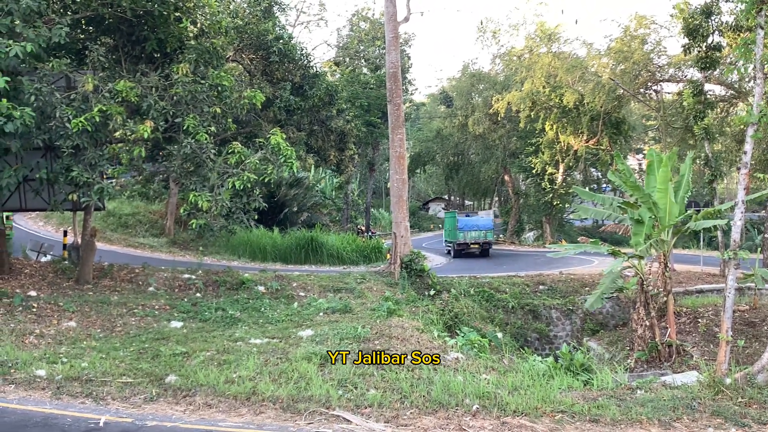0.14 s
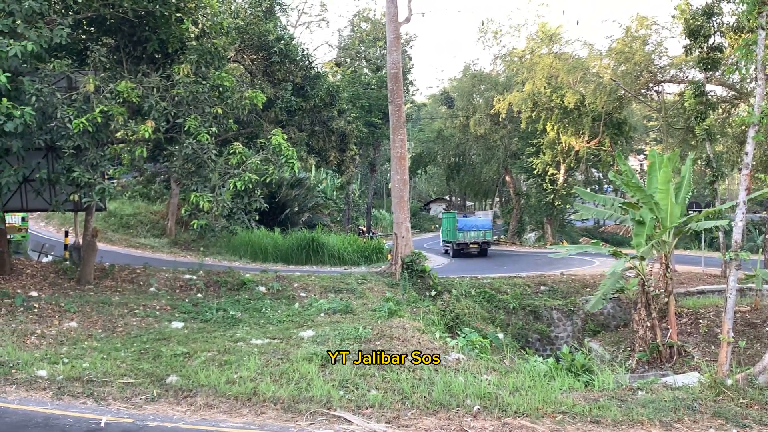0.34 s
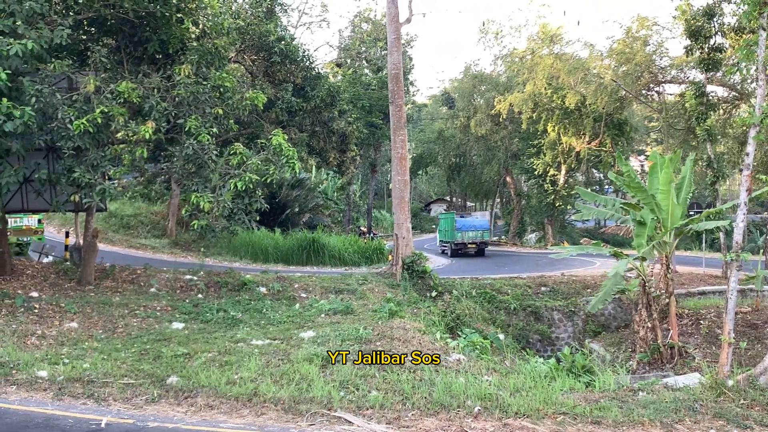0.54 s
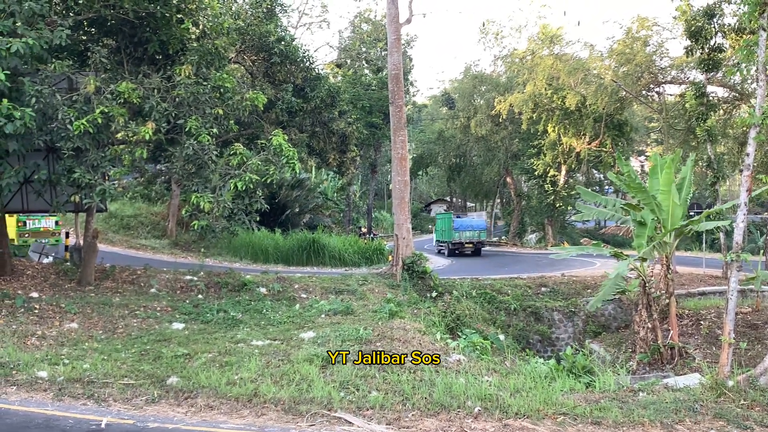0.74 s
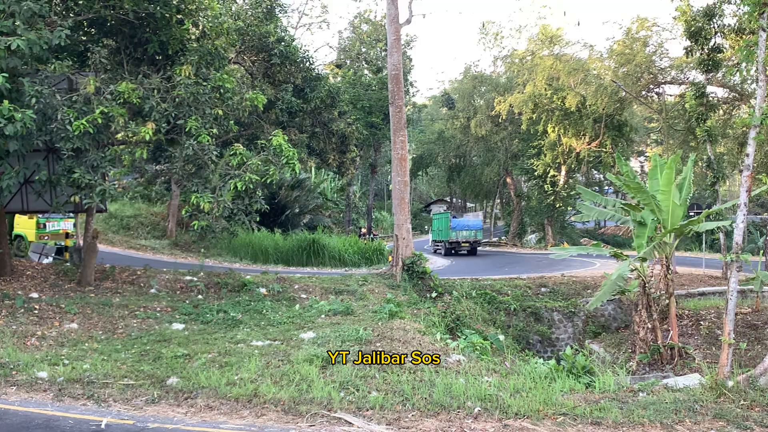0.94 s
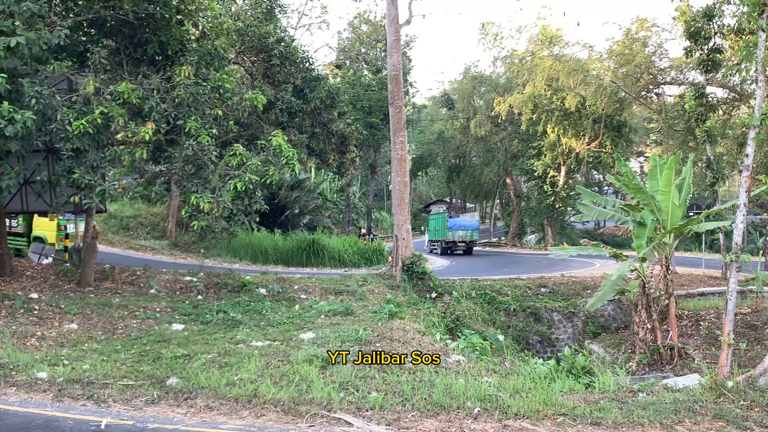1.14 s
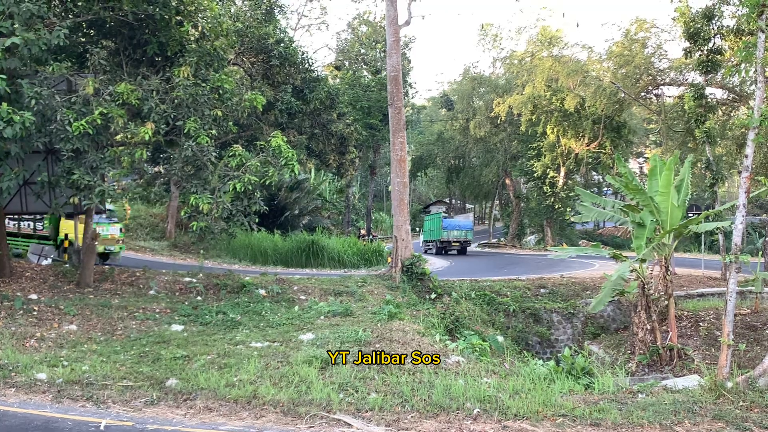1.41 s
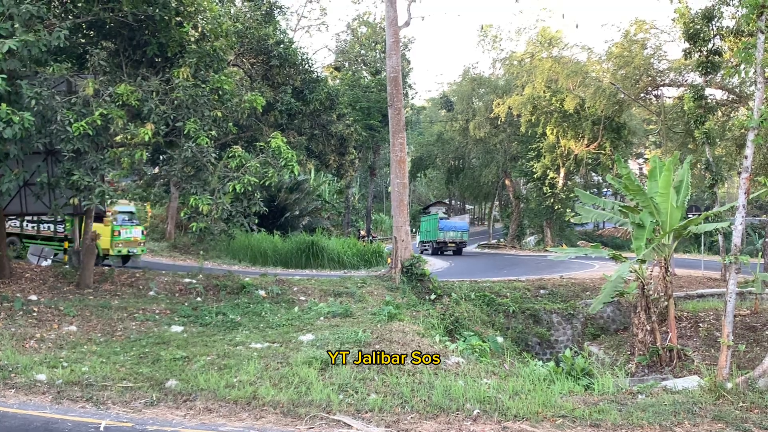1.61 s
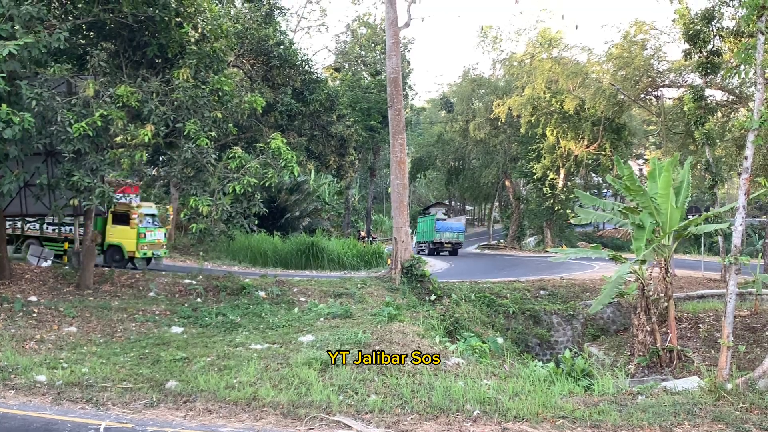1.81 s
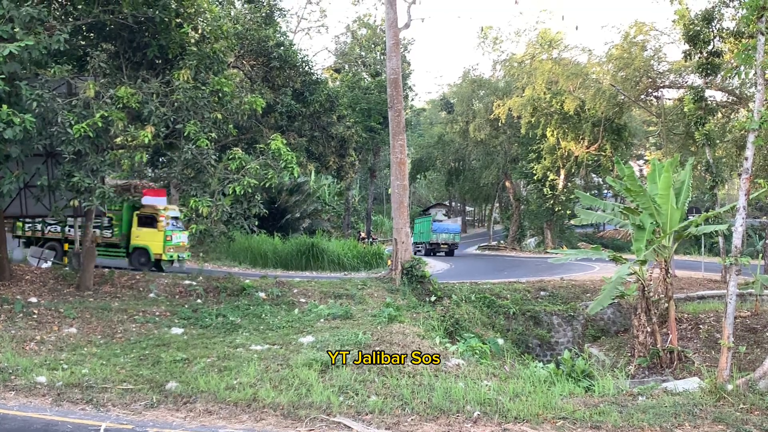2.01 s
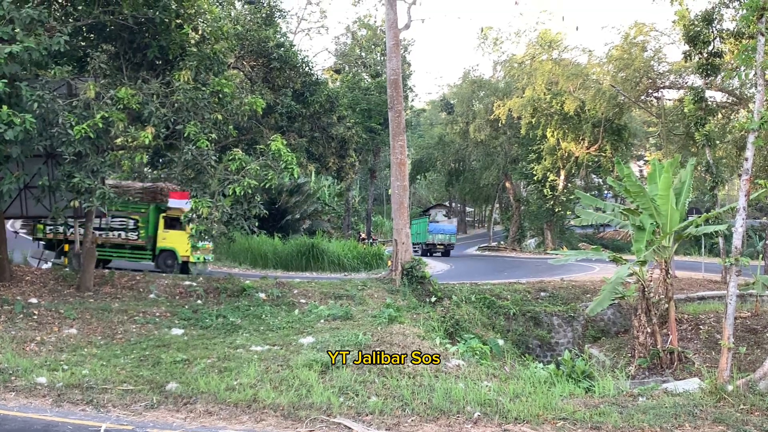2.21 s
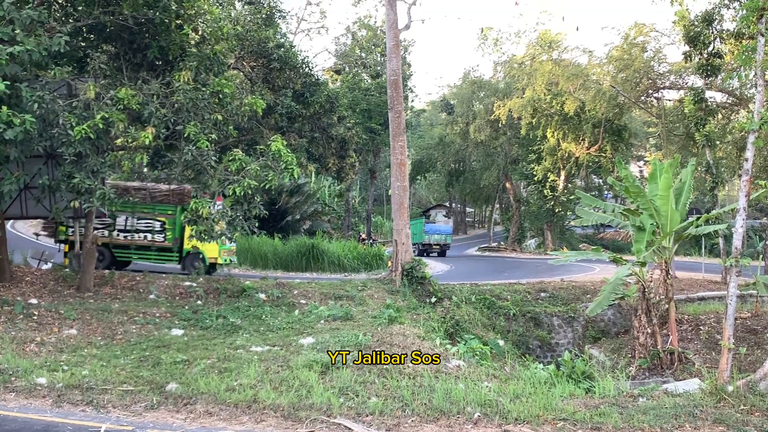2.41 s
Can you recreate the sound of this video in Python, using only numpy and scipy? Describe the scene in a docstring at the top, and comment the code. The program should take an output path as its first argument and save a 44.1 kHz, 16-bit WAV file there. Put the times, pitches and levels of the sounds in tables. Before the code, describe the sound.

Diesel engine rumble from a truck on a rural bend, first low and screened, then clearer and clattering with a thin late whine; soft thuds, wind buffeting a fixed stereo microphone, and rustling foliage.

```python
"""A low exhaust drone over wind rumble comes first: a loaded diesel truck rounds a rural bend, to the left.
As it clears the trees, clatter, block tones and tyre hiss come forward; a thin whine then rises.
The engine is tones locked to the shaft plus a noise burst per firing; tyres and leaves are filtered noise.
A gliding boom, rough shudders, dull knocks and faint chirrs sit around it, over low noise for the wind."""
import sys
import numpy as np
from scipy import signal
from scipy.fft import rfft, irfft
from scipy.io import wavfile
from scipy.ndimage import map_coordinates

SR = 44100
rng = np.random.default_rng(int(sys.argv[2]) if len(sys.argv) > 2 else 0)


def dump(signal):
    """Clip the signal to [-1, 1] and save it as 16-bit WAV at the path in sys.argv[1]."""
    limited = np.clip(np.atleast_2d(signal).T, -1, 1)
    pcm = np.round(limited * 32767).astype(np.int16)
    wavfile.write(sys.argv[1], SR, pcm)


N = 112454
T = np.arange(N) / SR

# The truck's place to the left: lag between ports, level between ports, share scattered by the trees
TRUCK_LAG_S, TRUCK_PAN_DB, SCATTER_DB = 0.00042, 5.5, -4
CLEARS_S, CLEARING_S = 1.58, 0.24  # when and how gradually the truck leaves the trees


def truck():
    """The engine's parts share one crankshaft; tyres run beside them, and the trees screen some parts."""
    turns = crankshaft()
    hidden = 1 - rise(CLEARS_S, CLEARING_S)
    low_tones = ports(exhaust(turns) + cargo_body(turns), TRUCK_LAG_S)
    engine_tones = ports(block(turns, hidden) + whine(), TRUCK_LAG_S, TRUCK_PAN_DB)
    return clatter(turns, hidden) + tyres(hidden) + low_tones + engine_tones


# Engine speed before a slight random drift (t/s, shaft f/Hz)
SHAFT_SPEED = [(0, 27.7), (.27, 27.35), (.55, 28.3), (.75, 27.8), (1.35, 28.1), (1.6, 28.3), (1.8, 29),
               (2.02, 29.4), (2.55, 29.4)]


def crankshaft():
    """Shaft turns so far: the running sum of a slightly unsteady speed."""
    unsteady = 1 + 0.0011 * walk(2.6)
    return np.cumsum(curve(SHAFT_SPEED) * unsteady) / SR


# Overall level of the exhaust drone (t/s, level/dB)
DRONE_LEVEL = [(0, -40), (.3, -40), (.55, -38.5), (.75, -44.5), (1.3, -44.5), (1.7, -58.5), (2.55, -44)]
# Exhaust tones within the drone (multiple of the shaft, mean level/dB)
EXHAUST_TONES = [(4, -4), (6, -0.5), (8, -9.5)]


def exhaust(turns):
    """Exhaust pulses heard as wavering harmonics of the shaft."""
    return lines(turns, EXHAUST_TONES, waver_db=2.5, waver_hz=7.6) * undb(curve(DRONE_LEVEL))


# Regular strength of successive firings, before random scatter (level/dB)
CYLINDERS = [-0.69, 0.62, -1.4, -0.46]
# Colour of the clatter (f/Hz, relative level/dB per Hz)
CLATTER_COLOUR = [(200, -3), (360, -1.5), (480, -5), (590, 0.5), (660, 5.5), (760, 0.5), (1000, -5),
                  (1450, -14.5), (1750, -7), (3500, -27), (7000, -72)]
FIRING_SCATTER_DB, FIRING_DECAY = 1.7, 2.7  # decay in firing intervals
CLATTER_DB, CLATTER_HIDDEN_DB = -45, -1.5


def clatter(turns, hidden):
    """Each firing, two per turn, restarts a decaying noise burst with its own strength."""
    firing = (2 * turns).astype(int)
    phase = 2 * turns % 1
    scatter = FIRING_SCATTER_DB * rng.standard_normal(N)[firing]
    size = undb(np.array(CYLINDERS)[firing % len(CYLINDERS)] + scatter)
    bursts = size * np.exp(-phase / FIRING_DECAY) * rng.standard_normal(N)
    direct = colour(bursts, CLATTER_COLOUR)
    placed = outdoors(direct, CLATTER_COLOUR, TRUCK_LAG_S, SCATTER_DB, TRUCK_PAN_DB)
    return placed * undb(CLATTER_DB + CLATTER_HIDDEN_DB * hidden)


# Engine block tones before the block's own level (multiple of the shaft, mean level/dB)
BLOCK_TONES = [(13, -4), (14, -7), (15, -6), (20, -6), (22, 1), (23, -5)]
BLOCK_DB, BLOCK_HIDDEN_DB = -53.5, -10


def block(turns, hidden):
    """The engine block rings at higher shaft harmonics, muffled while the trees hide it."""
    level = undb(BLOCK_DB + BLOCK_HIDDEN_DB * hidden)
    return lines(turns, BLOCK_TONES, waver_db=2.5, waver_hz=5.1) * level


# A thin whine (t/s, f/Hz, level/dB)
WHINE_GLIDE = [(2.05, 702, -68), (2.18, 704, -53), (2.37, 712, -52.5), (2.55, 738, -53.5)]


def whine():
    """One sine swells in, then climbs in pitch."""
    return tone(WHINE_GLIDE)


# Cargo body hum at the top of its swell (multiple of the shaft, mean level/dB)
BODY_TONES = [(10, -47.5)]


def cargo_body(turns):
    """The cargo body hums briefly in step with the engine."""
    return lines(turns, BODY_TONES, waver_db=5, waver_hz=10) * swell(at_s=1.79, length_s=.16)


# Colour of tyres and rushing air (f/Hz, relative level/dB per Hz)
TYRE_COLOUR = [(900, 1), (1150, -5), (1500, 4), (1700, -2), (2300, -3), (2600, 2.5), (2950, -2), (3200, -2),
               (3500, 2.5), (3950, 2.5), (4200, -3), (5300, -0.5), (7300, -4.5), (14000, -26.5)]
TYRES_DB, TYRES_HIDDEN_DB = -46, -3.5  # before the patchy flicker
TYRES_SCATTER_DB, TYRES_PAN_DB = 6, 4.5


def tyres(hidden):
    """Tyres and rushing air make a broad hiss, more scattered than direct."""
    hiss = outdoors(noise(TYRE_COLOUR), TYRE_COLOUR, TRUCK_LAG_S, TYRES_SCATTER_DB, TYRES_PAN_DB)
    return patchy(hiss * undb(TYRES_DB + TYRES_HIDDEN_DB * hidden))


# A deep boom that starts on the firing note, then wanders (t/s, f/Hz, level/dB before the throb)
BOOM_GLIDE = [(0, 55.5, -31.5), (.2, 52.33, -33.5), (.33, 57.8, -35.5), (.54, 55.24, -30.5),
              (.7, 64.27, -35), (.84, 79.8, -37.5), (.93, 69, -32.5), (1.02, 58.74, -35),
              (1.18, 51.18, -35), (1.32, 67.9, -38), (1.55, 60.92, -37), (1.85, 74.9, -37),
              (1.92, 56.7, -47), (1.98, 52.3, -25.5), (2.07, 56.7, -45), (2.15, 66.4, -29.5),
              (2.35, 59.7, -40), (2.55, 66.6, -41)]
BOOM_LAG_S = 0.00082


def boom():
    """A deep gliding sine throbs at random at the bottom of the rumble."""
    throb = unit(undb(2.1 * walk(16)))
    return ports(tone(BOOM_GLIDE) * throb, BOOM_LAG_S)


# Colour of the shudder (f/Hz, relative level/dB per Hz)
SHUDDER_COLOUR = [(110, 4.5), (250, 4.5), (330, 0.5), (420, -3), (520, -15.5), (1000, -31), (2000, -53)]
# Surges of shaking (centre t/s, length of the swell/s, top level/dB)
SHUDDER_SURGES = [(.63, .03, -48), (.98, .07, -47), (1.28, .07, -41), (1.417, .006, -30),
                  (1.498, .005, -35), (1.6, .1, -45), (1.73, .024, -34)]


def shudder():
    """Short, rough low-middle noise surges, perhaps the load shaking."""
    surges = sum(undb(db) * swell(at, length) for at, length, db in SHUDDER_SURGES)
    return ports(noise(SHUDDER_COLOUR) * surges, TRUCK_LAG_S)


# Dull knocks (onset t/s, envelope peak level/dB)
KNOCK_HITS = [(0.6, -24), (0.968, -21), (1.4195, -10.3), (1.724, -23), (1.934, -27), (2.394, -24)]
KNOCK_START_HZ, KNOCK_END_HZ, KNOCK_FALL_S = 390, 80, .0058
KNOCK_ATTACK_S, KNOCK_LAG_S = 0.0078, -0.00051  # onset to peak; the right port hears it first


def knocks():
    """Soft thuds close to the microphone; each drops at once from a hollow tap to a deep thump."""
    thuds = np.zeros(N)
    for at, db in KNOCK_HITS:
        age = np.maximum(T - at, 0)
        fall = np.exp(-(age / KNOCK_FALL_S) ** 2)
        hz = KNOCK_END_HZ + (KNOCK_START_HZ - KNOCK_END_HZ) * fall
        push = (age / KNOCK_ATTACK_S * np.exp(1 - age / KNOCK_ATTACK_S)) ** 2
        turns = np.cumsum(hz * (age > 0)) / SR
        thuds -= undb(db) * push * np.sin(2 * np.pi * turns)
    return ports(thuds, KNOCK_LAG_S)


# Colour of the foliage hiss (f/Hz, relative level/dB per Hz)
LEAF_COLOUR = [(1200, -7), (2500, 0.5), (4500, 2.5), (6500, 1.5), (8500, 4), (10500, 3), (12800, 3),
               (14500, -5)]
# Level of the foliage before the patchy flicker (t/s, level/dB)
LEAF_LEVEL = [(0, -54), (.5, -50), (.85, -52.5), (1.25, -49), (1.6, -48), (1.92, -47.5), (2.15, -44),
              (2.55, -42.5)]
LEAVES_LAG_S, LEAVES_SCATTER_DB = -0.0002962, -11  # the right port hears it first


def leaves():
    """Foliage gives a fine, flickering hiss from the right that swells and ebbs."""
    hiss = outdoors(noise(LEAF_COLOUR), LEAF_COLOUR, LEAVES_LAG_S, LEAVES_SCATTER_DB)
    return patchy(hiss * undb(curve(LEAF_LEVEL)))


# Faint chirrs, perhaps an insect (centre t/s, level/dB of the swell)
CHIRR_SWELLS = [(.33, -56.5), (1.12, -60), (1.33, -62.5)]
CHIRR_HZ, CHIRR_WIDTH_HZ, CHIRR_LENGTH_S = 4580, 260, 0.26


def chirrs():
    """A high sine, roughened by fast random wandering into a narrow band, swells and fades."""
    rough = np.sin(2 * np.pi * CHIRR_HZ * T) * walk(CHIRR_WIDTH_HZ)
    return rough * sum(undb(db) * swell(at, CHIRR_LENGTH_S) for at, db in CHIRR_SWELLS)


# Colour of the wind rumble (f/Hz, relative level/dB per Hz)
WIND_COLOUR = [(22, -34), (35, -0.5), (55, 1), (90, 0.5), (130, -5.5), (200, -8), (280, -18), (400, -32.5),
               (600, -32), (1200, -64.5)]
# Level of the rumble common to both ports (t/s, level/dB)
WIND_LEVEL = [(0, -35), (.23, -34), (.42, -35), (.56, -33.5), (.75, -33), (.98, -33), (1.16, -30),
              (1.34, -30), (1.55, -30), (1.74, -32.5), (1.91, -34), (2.07, -40), (2.15, -30.5), (2.27, -35),
              (2.4, -31.5), (2.55, -34)]
WIND_SIDE_DB = -11  # the part that differs between ports


def wind():
    """Wind buffets both ports nearly alike: shared low noise plus a weaker opposed part."""
    deep_cut = [(25, 0.013), (1000, 0)]  # practically flat, falling away below 25 Hz
    mid, side = (colour(noise(WIND_COLOUR), deep_cut) for _ in range(2))
    return (mid + undb(WIND_SIDE_DB) * np.array([side, -side])) * undb(curve(WIND_LEVEL))


def undb(db):
    """Decibels to gain."""
    return 10 ** (np.asarray(db) / 20)


def curve(rows):
    """Straight lines in time through (t/s, value) rows."""
    return np.interp(T, *np.array(rows).T)


def unit(x):
    """Scale to rms 1."""
    return x / np.sqrt(np.mean(x ** 2))


def rise(at_s, over_s):
    """A smooth step from 0 to 1."""
    return .5 + .5 * np.tanh((T - at_s) / (2 * over_s))


def swell(at_s, length_s):
    """A smooth bell-shaped rise and fall, top 1."""
    return np.exp(-.5 * ((T - at_s) / length_s) ** 2)


def walk(hz):
    """Smooth random wandering with spread 1: noise softened above hz."""
    f = np.arange(N // 2 + 1) * SR / N
    return unit(irfft(rfft(rng.standard_normal(N)) / (1 + (f / hz) ** 2) ** 2, N))


def tone(rows):
    """A gliding sine along (t/s, f/Hz, level/dB) rows."""
    at, hz, db = np.array(rows).T
    turns = np.cumsum(np.interp(T, at, hz)) / SR + rng.random()
    return np.sqrt(2) * undb(np.interp(T, at, db)) * np.sin(2 * np.pi * turns)


def lines(turns, orders, waver_db, waver_hz):
    """Sines locked to the crankshaft, each wavering in level on its own."""
    total = np.zeros(N)
    for k, db in orders:
        level = np.sqrt(2) * undb(db + waver_db * walk(waver_hz))
        total += level * np.sin(2 * np.pi * (round(k) * turns + rng.random()))
    return total


def colour(x, points):
    """Filter by (f/Hz, level/dB) points; rms 1, falling away below the first point."""
    hz, db = np.array(points).T
    f = np.maximum(np.arange(N // 2 + 1) * SR / N, 1)
    gain = undb(np.interp(np.log(f), np.log(hz), db))
    bass_fall = np.minimum(f / hz[0], 1) ** 2
    return unit(irfft(rfft(x) * gain * bass_fall, N))


def noise(points):
    """Coloured noise."""
    return colour(rng.standard_normal(N), points)


def ports(x, lag_s, pan_db=0):
    """Two microphone ports; a positive lag reaches the left one first."""
    turn = np.exp(1j * np.pi * np.arange(N // 2 + 1) * SR / N * lag_s)
    left = irfft(rfft(x) * turn, N) * undb(pan_db / 2)
    right = irfft(rfft(x) / turn, N) * undb(-pan_db / 2)
    return np.array([left, right])


def outdoors(direct, points, lag_s, scatter_db, pan_db=0):
    """The direct sound plus the diffuse wash of the same colour that the trees scatter back."""
    wash = np.array([noise(points), noise(points)])
    return unit(ports(direct, lag_s, pan_db) + undb(scatter_db) * wash)


PATCHY_DB, PATCHY_HZ, PATCH_WIDTH_HZ = 2, 7.6, 170  # depth, softening rate, spacing of the bands


def patchy(x):
    """Moving air makes neighbouring narrow bands swell and fade apart."""
    f, t, z = signal.stft(x, SR, nperseg=1024)
    speed = np.fft.rfftfreq(len(t), t[1])
    drift = rfft(rng.standard_normal((400, len(t)))) / (1 + (speed / PATCHY_HZ) ** 2) ** 2
    drift = unit(irfft(drift, len(t)))
    # blend between neighbouring bands so the level varies smoothly with frequency
    grid = np.meshgrid(f / PATCH_WIDTH_HZ, np.arange(len(t)), indexing="ij")
    db = PATCHY_DB * map_coordinates(drift, grid, order=1, mode="mirror")
    return signal.istft(z * undb(db), SR)[1][..., :N]


def scene():
    """The truck and the roadside, with the wind on the microphone."""
    return truck() + boom() + shudder() + knocks() + leaves() + chirrs() + wind()


LOW_CUT_HZ, TOP_HZ = 26, 14700


def record(dry):
    """The recorder cuts the deepest bass without phase shift, and the top steeply."""
    low_cut = signal.butter(3, LOW_CUT_HZ, "high", fs=SR, output="sos")
    lean = signal.sosfiltfilt(low_cut, dry, padtype="even", padlen=4000)
    top_cut = signal.ellip(8, .2, 80, TOP_HZ, fs=SR, output="sos")
    return signal.sosfilt(top_cut, lean)


dry = scene()
out = record(dry)
dump(out)
```